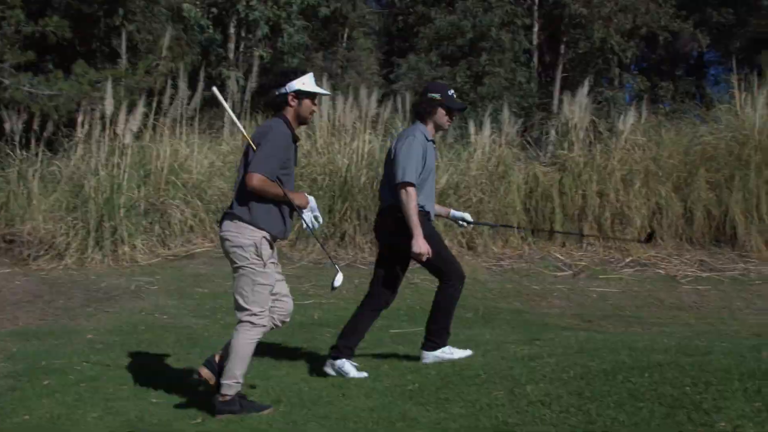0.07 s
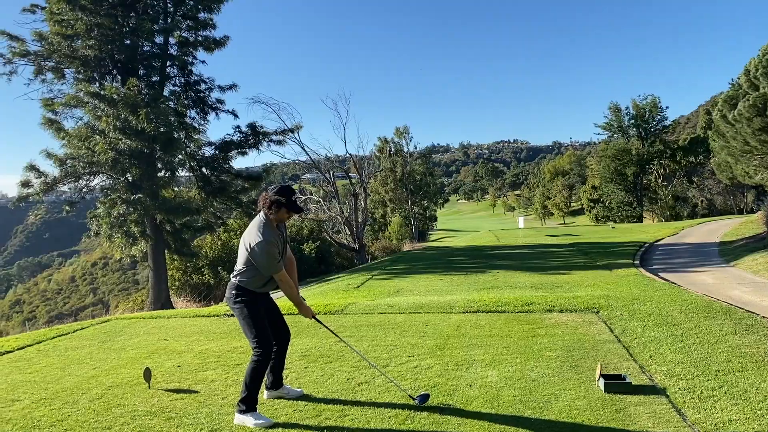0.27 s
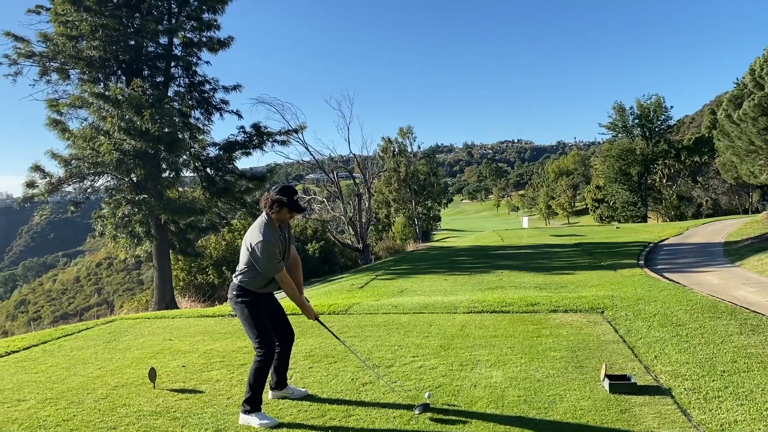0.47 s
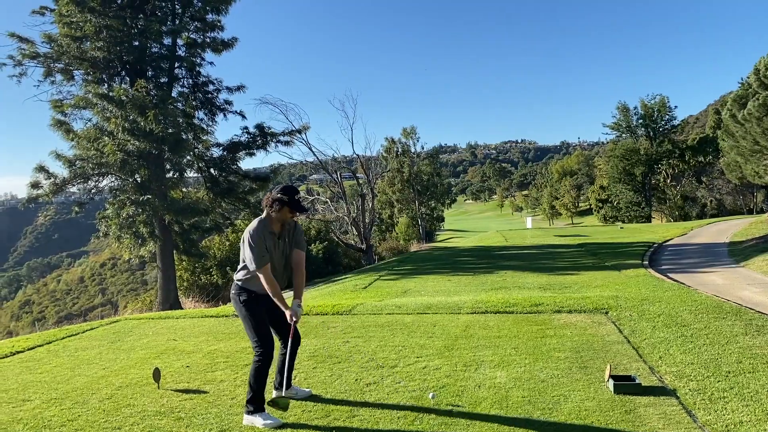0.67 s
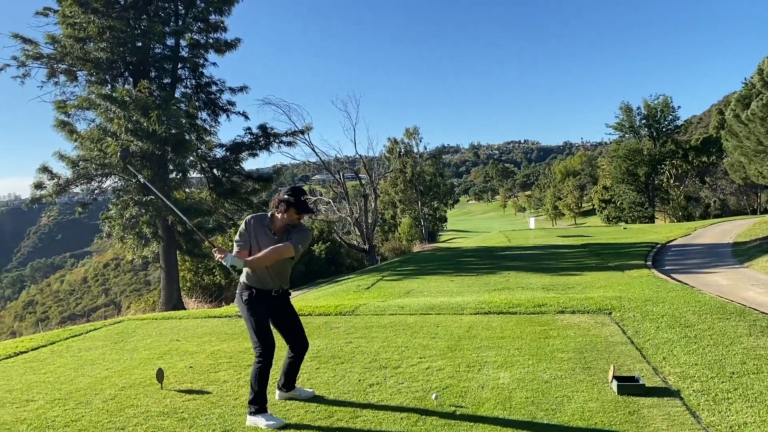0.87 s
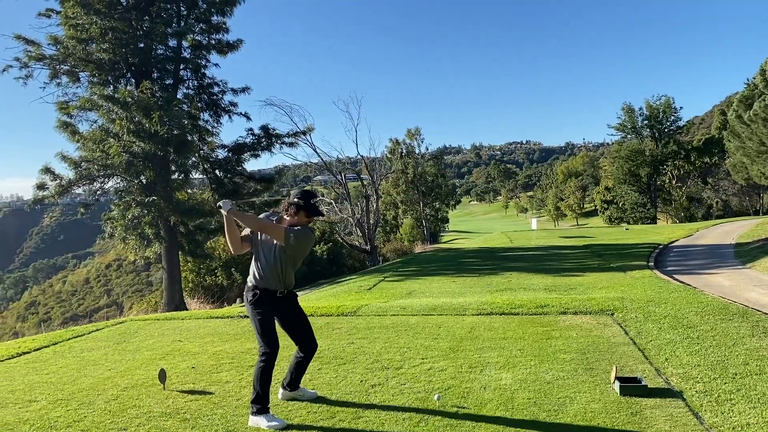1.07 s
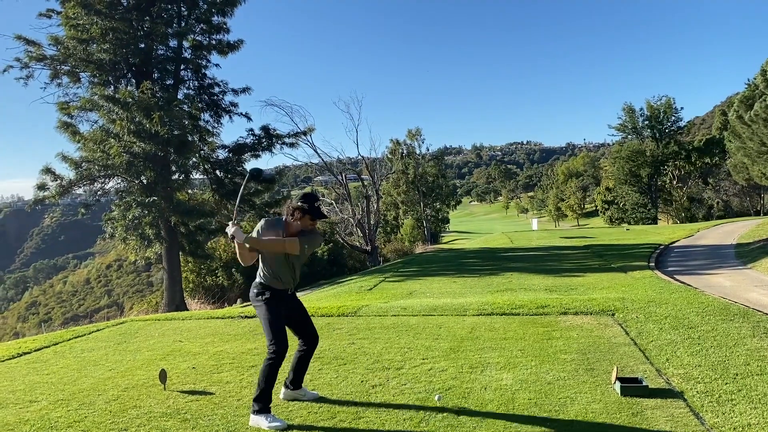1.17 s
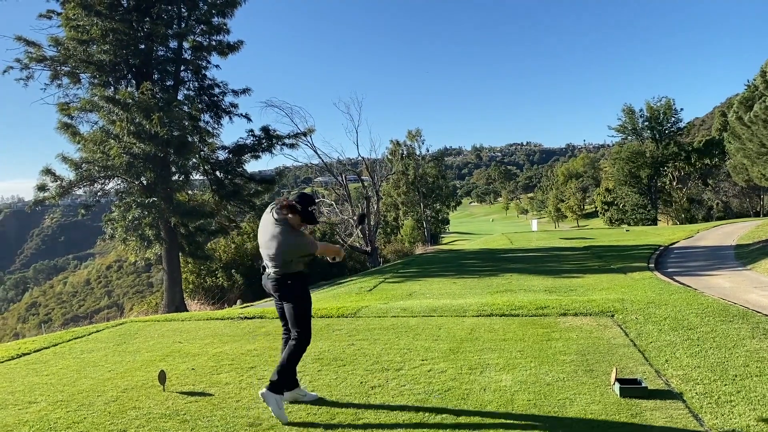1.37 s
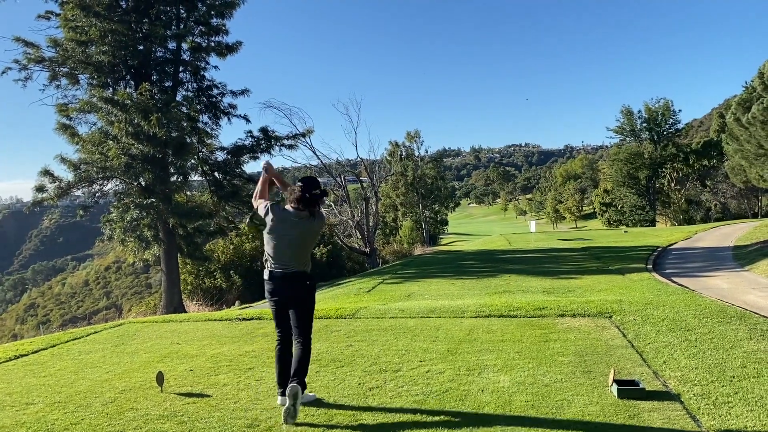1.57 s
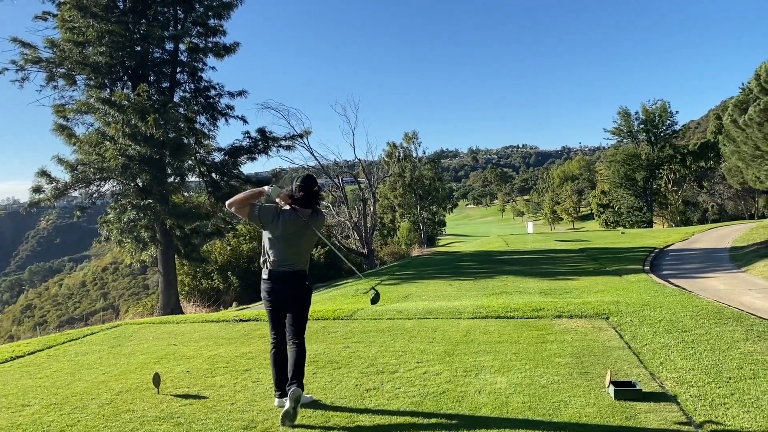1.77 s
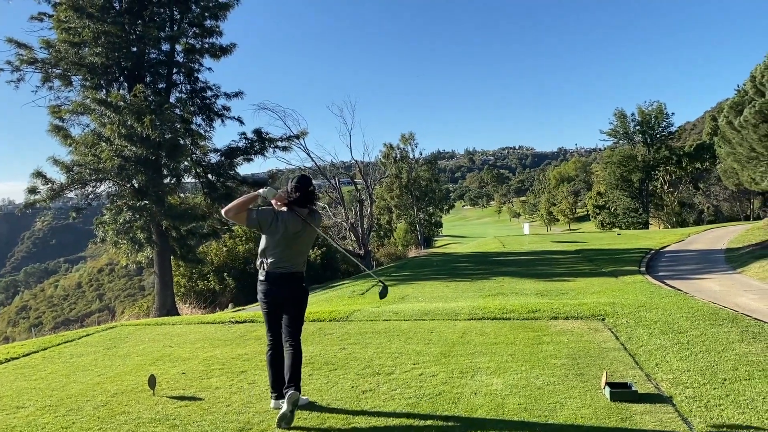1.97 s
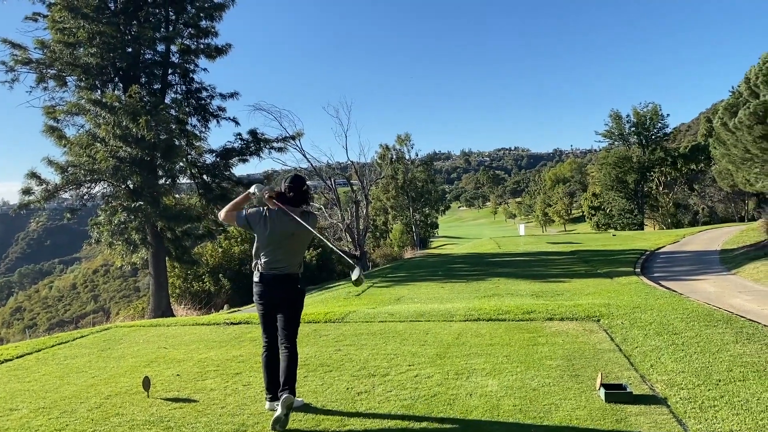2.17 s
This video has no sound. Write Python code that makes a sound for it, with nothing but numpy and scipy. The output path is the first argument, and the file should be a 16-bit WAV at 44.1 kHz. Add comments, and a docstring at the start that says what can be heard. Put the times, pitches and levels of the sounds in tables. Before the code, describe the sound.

Golf tee shot outdoors, microphone close to the body: quiet air and cloth rustle, small ticks, dull bumps, a quick club whoosh, then a hard hollow crack with a short bright ring and fading rustle.

```python
"""An open golf course: a golfer drives a ball off the tee, heard from a microphone close to the body.
Grainy noise rustles as clothes, sagging low cycles bump the microphone and narrow noise whooshes as the club.
The ball knocks and pops off the face, then noise cracks and the hollow head rings as gliding sine modes.
Diffuse noise and sparse echoes return from ground and trees; low air and a distant roar lie under it.
A low hum with a light hiss is heard only in the first fifth of a second and stops as the level dips briefly.
"""
import sys
import numpy as np
from scipy import signal
from scipy.fft import rfft, irfft
from scipy.io import wavfile
from scipy.ndimage import uniform_filter1d

SR = 44100
rng = np.random.default_rng(int(sys.argv[2]) if len(sys.argv) > 2 else 0)


def persist_wave(psi):
    """Save psi, clipped to +-1, as 16-bit WAV."""
    counts = np.round(np.clip(psi, -1, 1) * 32767).astype(np.int16)
    wavfile.write(sys.argv[1], SR, np.atleast_2d(counts).T)


N = 97284
T = np.arange(N) / SR
HIT_S = 1.3725  # the club meets the ball


def amp(db):
    """Converts decibels to linear gain."""
    return 10 ** (np.asarray(db) / 20)


def unit(x):
    """Scales a signal to rms 1."""
    return x / np.sqrt(np.mean(x ** 2) + 1e-20)


def curve(points, column=1):
    """Draws automation: straight lines through rows of (seconds, value, ..)."""
    rows = np.array(points)
    return np.interp(T, rows[:, 0], rows[:, column])


def noise(spectrum):
    """Colours noise by rows of (Hz, dB), rolls it off below 25 Hz and scales it to rms 1."""
    hz, db = np.transpose(spectrum)
    f = np.fft.rfftfreq(N, 1 / SR)
    colour = amp(np.interp(np.log(f + 1), np.log(hz + 1), db))
    rumble_cut = f ** 2 / (f ** 2 + 25 ** 2)
    return unit(irfft(rfft(rng.standard_normal(N)) * colour * rumble_cut, N))


def whistle(hz, width_hz):
    """Shifts slow complex noise up to a moving pitch: a narrow, breathy tone of rms 1."""
    pole = np.exp(-np.pi * width_hz / SR)
    slow = rng.standard_normal(N) + 1j * rng.standard_normal(N)
    for _ in range(2):
        slow = signal.lfilter([1 - pole], [1, -pole], slow)
    steadier = slow / np.sqrt(abs(slow) + 1e-12)  # evens out the swells
    carrier = np.exp(2j * np.pi * np.cumsum(hz * np.ones(N)) / SR)
    return unit((steadier * carrier).real)


def envelope(start, rise, hold, t60):
    """Shapes a smooth attack, a hold until a time after the start, then an exponential release."""
    t = T - start
    attack = np.sin(np.pi / 2 * np.clip(t / rise, 0, 1)) ** 2
    return attack * amp(-60 * np.maximum(t - hold, 0) / t60)


# Colour of the low outdoor air. Each row: frequency in Hz, relative level in dB per Hz.
AIR_COLOUR = [(15, -32), (25, -10), (64, 6.5), (92, 5), (180, -3), (223, -3), (439, -10.5), (489, -12),
              (560, -21), (1020, -11), (2280, -41), (11300, -45), (16000, -52)]
# Colour of the distant roar. Each row: frequency in Hz, relative level in dB per Hz.
ROAR_COLOUR = [(100, 0), (400, -6), (560, 0), (720, 1), (1000, -5.5), (1250, -18), (1550, -17.5),
               (2000, -24.5), (2600, -40), (6000, -58), (16000, -47.5)]
# Swell of the roar. Each row: time in seconds, level in dB.
ROAR_SWELL = [(0, -57.5), (.85, -58.5), (1.1, -50), (1.25, -54.5), (1.6, -48), (1.8, -46), (2, -46.5),
              (2.2, -48)]
# Colour of the light hiss heard with the hum. Each row: frequency in Hz, relative level in dB per Hz.
HISS_COLOUR = [(200, -1), (1500, -0.5), (3000, -6), (6000, -27), (16000, -18)]
AIR_DB, HISS_DB = -51.5, -67.5
HUM_HZ, HUM_DB, HUM_WIDTH_HZ = 88.8, -46, 5.1
DIP_S, DIP_DB, DIP_HALF_S = 0.211, -21.5, 0.0061  # the hum and hiss stop and the level dips briefly


def outdoors():
    """Low air and a swelling roar as noise; a narrow hum and a hiss stop early, where the level dips briefly."""
    hum = amp(HUM_DB) * whistle(HUM_HZ, HUM_WIDTH_HZ)
    hiss = amp(HISS_DB) * noise(HISS_COLOUR)
    air = amp(AIR_DB) * noise(AIR_COLOUR)
    roar = amp(curve(ROAR_SWELL)) * noise(ROAR_COLOUR)
    opening_only = np.clip((DIP_S - T) / DIP_HALF_S, 0, 1)
    dip = amp(DIP_DB * np.exp(-((T - DIP_S) / DIP_HALF_S) ** 2))
    return (air + roar + (hum + hiss) * opening_only) * dip


# Colour of the scatter from ground and trees. Each row: frequency in Hz, relative level in dB per Hz.
SCATTER_COLOUR = [(60, 12), (250, 11), (650, 7.5), (1500, -4.5), (2800, -12), (3600, 4), (4500, -5.5),
                  (6300, 3), (7500, 6), (7900, -10.5), (10300, -4.5), (16000, -16.5)]
SCATTER_DB, SCATTER_RISE_S, SCATTER_T60_S = -27, .015, .26
ECHO_S, ECHO_DB, ECHO_T60_S, ECHO_LOW_HZ = 0.034, -24.5, 0.223, 5850


def surroundings(hit):
    """Diffuse scatter as fading noise; trees smear the hit into many sparse, bright reflections."""
    sparse = rng.random(N) < 2000 / SR  # about 2000 reflections a second
    taps = rng.standard_normal(N) * sparse * envelope(ECHO_S, 0.0067, 0, ECHO_T60_S)
    echo = signal.fftconvolve(hit, taps / np.linalg.norm(taps))[:N]
    echo = signal.sosfilt(signal.butter(4, ECHO_LOW_HZ, "high", fs=SR, output="sos"), echo)
    scatter = envelope(HIT_S, SCATTER_RISE_S, SCATTER_RISE_S, SCATTER_T60_S) * noise(SCATTER_COLOUR)
    return amp(ECHO_DB) * echo + amp(SCATTER_DB) * scatter


# Rustle of clothes through the swing. Each row: time in seconds, level in dB.
RUSTLE_LEVEL = [(0, -83), (.17, -66.5), (.23, -86), (.34, -76.5), (.42, -61), (.48, -63.5), (.55, -67.5),
                (.77, -69), (.87, -58.5), (.95, -62.5), (.99, -52), (1.08, -58.5), (1.15, -48.5),
                (1.21, -48.5), (1.24, -62.5), (1.27, -45.5), (1.32, -48), (1.37, -39.5), (1.52, -50.5),
                (1.6, -49), (1.63, -54.5), (1.66, -50.5), (1.78, -67), (1.87, -59), (1.95, -73.5),
                (2.2, -69)]
# Colour of the rustle. Each row: frequency in Hz, relative level in dB per Hz.
CLOTH_COLOUR = [(150, 10.5), (900, 7), (2300, 3.5), (4500, -2), (8000, -6.5), (13000, -8), (16000, -18.5)]
# Quick scuffs of cloth. Each row: centre in seconds, peak level in dB, half length in seconds.
SCUFF_EVENTS = [(0.1, -72, 0.0099), (0.924, -55, 0.01), (1.264, -43, 0.0087), (1.298, -40, 0.0055),
                (1.554, -39, 0.012), (1.574, -43.5, 0.007)]
# Brighter colour of the scuffs. Each row: frequency in Hz, relative level in dB per Hz.
SCUFF_COLOUR = [(150, 1), (800, 7), (1400, 9), (2300, 5), (4500, 4), (8000, 0.5), (13000, -1),
                (16000, -0.5)]
GRAIN_DB, GRAIN_S = 2, 0.0046  # rms depth of the flutter, length of its smoothing


def clothes():
    """Grainy friction of fabric that follows the body's turn, with a few quick, brighter scuffs."""
    scuff_level = sum(amp(db) * np.exp(-((T - s) / half_s) ** 2) for s, db, half_s in SCUFF_EVENTS)
    flutter = unit(uniform_filter1d(rng.standard_normal(N), max(int(GRAIN_S * SR), 1)))
    grain = unit(amp(GRAIN_DB * flutter))
    rustle = amp(curve(RUSTLE_LEVEL)) * noise(CLOTH_COLOUR)
    return grain * (rustle + scuff_level * noise(SCUFF_COLOUR))


# Small ticks of grip, shoes and clothing. Each row: start in seconds, peak level in dB, centre in Hz.
TICK_EVENTS = [(0.5222, -45, 1150), (.559, -52.5, 3470), (.681, -49, 3150), (0.7609, -47, 8700),
               (.8434, -31, 3180), (1.2568, -29, 1200), (1.257, -36, 7000), (1.268, -39, 7040),
               (1.2935, -30, 900), (1.652, -41, 9000), (1.6805, -40, 4770), (1.8597, -38.5, 2030),
               (1.86, -41, 6330), (1.868, -32.5, 13100), (2.06, -52, 3000)]
TICK_DECAY_S = 0.00076
TICK_SPREAD, TICK_SOFTEN = 0.46, 0.93  # resonance width and low-pass time, relative to the centre


def ticks():
    """Tiny snaps: an impulse and a short noisy crumble through a broad, softened resonance."""
    out, f = np.zeros(N), np.fft.rfftfreq(N, 1 / SR)
    for start, db, hz in TICK_EVENTS:
        decay = (T >= start) * np.exp(-abs(T - start) / TICK_DECAY_S)
        snap = 0.17 * rng.standard_normal(N) * decay
        snap[round(start * SR)] += 1
        s = 1j * f / hz
        resonance = s / (s * s + TICK_SPREAD * s + 1) / (1 + TICK_SOFTEN * s)
        snap = irfft(rfft(snap) * resonance, N)
        out += amp(db) * snap / abs(snap).max()
    return out


# Bumps of cloth on the microphone. Each row: start in seconds, peak of the swell in dB, first pitch in Hz,
# pitch it settles toward in Hz, time to the peak in seconds, puff level in dB.
BUMP_EVENTS = [(0.715, -37.5, 90, 65, 0.0033, -68), (1.2563, -25, 149, 59.4, 0.0034, -31.5),
               (1.2732, -8.5, 184, 78, 0.009, -28.5), (1.309, -23.5, 60, 40, 0.0088, -44.5),
               (1.3748, -14.5, 328.5, 52, 0.0098, -42), (1.404, -19.5, 90, 65, .008, -30.5),
               (1.477, -33.5, 60, 52, 0.01, -62), (1.547, -23, 300, 93, 0.0067, -31.5),
               (1.862, -36, 124, 80.4, 0.0067, -43)]
# Colour of the air squeezed from the fabric. Each row: frequency in Hz, relative level in dB per Hz.
PUFF_COLOUR = [(60, -8), (200, 4.5), (330, 2.5), (520, -9.5), (900, -28), (3000, -47.5), (16000, -69)]
BUMP_SAG_S = 0.0034  # time constant of the pitch sag
PUFF_SHARE = .6  # the puff peaks at this share of the bump's swell time


def bumps():
    """Each bump is a dull puff of squeezed air and a few low cycles that sag in pitch."""
    out, air = np.zeros(N), noise(PUFF_COLOUR)
    for start, db, first_hz, final_hz, swell_s, puff_db in BUMP_EVENTS:
        t = np.maximum(T - start, 0)
        sag = (first_hz - final_hz) * BUMP_SAG_S * (1 - np.exp(-t / BUMP_SAG_S))
        cycles = np.sin(2 * np.pi * (final_hz * t + sag))
        u, quick = t / swell_s, t / (swell_s * PUFF_SHARE)
        thump = amp(db) * u * np.exp((1 - u ** 2) / 2) * cycles
        puff = amp(puff_db) * quick * np.exp(1 - quick) * air
        out += puff - thump
    return out


# Club through the air. Each row: time in seconds, vortex tone in Hz, level of that tone in dB.
SWING_PATH = [(1.315, 561.8, -57.5), (1.337, 814.5, -37.5), (1.35, 1003, -37.5), (1.359, 1148, -25),
              (1.372, 1114, -28), (1.39, 897, -38.5), (1.43, 613, -52), (1.5, 446, -73)]
# Colour of the turbulence behind the club. Each row: frequency in Hz, relative level in dB per Hz.
WAKE_COLOUR = [(40, 3.5), (150, 1.5), (450, 0), (950, -0.5), (1400, -15.5), (4000, -28.5), (16000, -43.5)]
SWING_WIDTH_HZ, SHAFT_WIDTH_HZ, SHAFT_RATIO = 140, 221, .69
SHAFT_DB, WAKE_DB = -3.5, -3  # relative to the main tone


def whoosh():
    """Vortex tones rise and fall with the club's speed over a rough wake; silent outside the fast part."""
    hz, level = curve(SWING_PATH), amp(curve(SWING_PATH, column=2))
    fast = (T > SWING_PATH[0][0]) & (T < SWING_PATH[-1][0])
    head_tone = whistle(hz, SWING_WIDTH_HZ)
    shaft_tone = amp(SHAFT_DB) * whistle(hz * SHAFT_RATIO, SHAFT_WIDTH_HZ)
    wake = amp(WAKE_DB) * noise(WAKE_COLOUR)
    return fast * level * (head_tone + shaft_tone + wake)


# Ball on the face. A single row: pitch in Hz, level in dB, length in seconds.
BALL_POP = (2420, -4.5, 0.0031)
# Blunt front of the blow. Each row: frequency in Hz, relative level in dB per Hz.
KNOCK_COLOUR = [(100, -1), (330, 5.5), (560, -1), (850, -3), (1200, 3), (1700, -7), (2900, 0.5),
                (4000, -13.5), (8000, -16), (16000, -30.5)]
# Modes of the hollow head. Each row: pitch before the glide in Hz, level in dB, 60 dB decay time in seconds,
# rise in seconds.
HEAD_MODES = [(2327, -17, 0.032, 0.0012), (3366, -22, .05, 0.019), (3520, -13.5, 0.05, 0.01),
              (3680, -13, 0.099, 0.0087), (4410, -29, 0.0548, 0.0069), (5410, -28, .04, 0.011),
              (5740, -24, .04, .005), (6730, -20, 0.037, .004), (6942, -16.5, 0.031, 0.0036),
              (7110, -19, .04, 0.0028), (7550, -24, 0.13, .004), (8200, -15, 0.03645, 0.0025),
              (8740, -26, .04, 0.012), (9360, -27, 0.0597, .005), (10620, -22.5, 0.023, 0.0023)]
# Dense crack of the face. Each row: frequency in Hz, relative level in dB per Hz.
CRACK_COLOUR = [(60, -6.5), (250, 2.5), (600, -2.5), (1150, -1), (1750, -11), (2800, -4.5), (4500, -8),
                (7500, -0.5), (10500, -3.5), (13000, -12), (16000, -10)]
KNOCK_DB, KNOCK_HOLD_S, KNOCK_T60_S = -10, .0045, 0.014
CRACK_DB, CRACK_RISE_S, CRACK_HOLD_S, CRACK_T60_S = -17.5, .004, 0.0094, 0.044
CONTACT_S = 0.0028  # the face rings freely only as the ball leaves
GLIDE, GLIDE_MID_S, GLIDE_TURN_S = .023, .021, .006  # Doppler rise as a fraction, its midpoint and its pace


def strike():
    """The ball knocks and pops off the face; then the head cracks and rings, gliding up as it swings on."""
    t, free = np.maximum(T - HIT_S, 0), HIT_S + CONTACT_S
    pop_hz, pop_db, pop_s = BALL_POP
    pop_shape = np.sqrt(np.abs(np.sin(np.pi * np.minimum(t / pop_s, 1))))
    pop = amp(pop_db) * pop_shape * np.sin(2 * np.pi * pop_hz * t)
    knock = amp(KNOCK_DB) * envelope(HIT_S, 0.00033, KNOCK_HOLD_S, KNOCK_T60_S) * noise(KNOCK_COLOUR)
    pitch_ratio = 1 + GLIDE / (1 + np.exp((GLIDE_MID_S - t) / GLIDE_TURN_S))
    glided_s = np.cumsum((t > 0) * pitch_ratio) / SR  # time stretched by the glide
    ring = np.zeros(N)
    for hz, db, t60, rise in HEAD_MODES:
        mode = np.sin(2 * np.pi * (hz * glided_s + rng.random()))
        ring += amp(db) * envelope(free, rise, rise, t60) * mode
    crack = amp(CRACK_DB) * envelope(free, CRACK_RISE_S, CRACK_HOLD_S, CRACK_T60_S) * noise(CRACK_COLOUR)
    return pop + knock + ring + crack


def scene():
    """Mixes all sources at one microphone."""
    hit = strike()
    background = outdoors() + surroundings(hit)
    body = clothes() + ticks() + bumps()
    return (background + body + whoosh() + hit)[None]


CEILING = 0.47  # amplitude that the soft overload approaches
EDGE_HZ = 15850


def record(dry):
    """Loud peaks overload the recorder softly; then a steep low-pass limits the band."""
    held = dry / (1 + (dry / CEILING) ** 4) ** (1 / 4)
    low_pass = signal.firwin(511, EDGE_HZ, window=("kaiser", 9), fs=SR)
    return signal.oaconvolve(held, low_pass[None], "same")


dry = scene()
out = record(dry)
persist_wave(out)
```